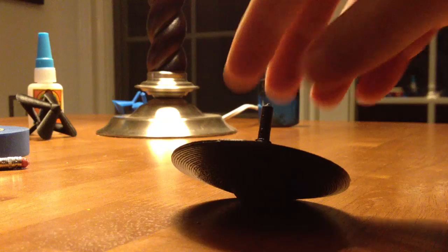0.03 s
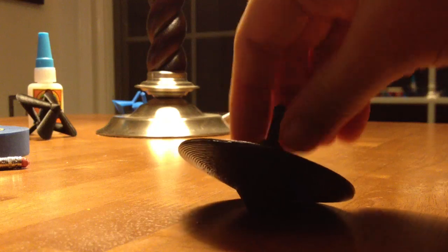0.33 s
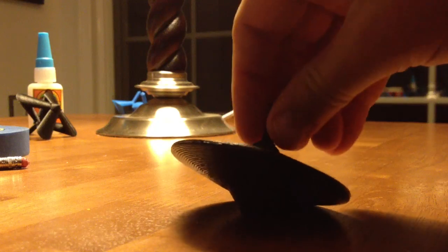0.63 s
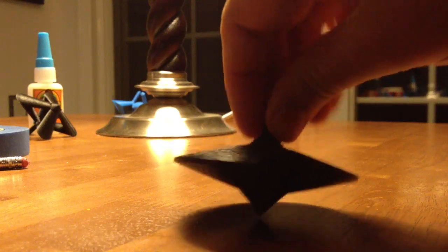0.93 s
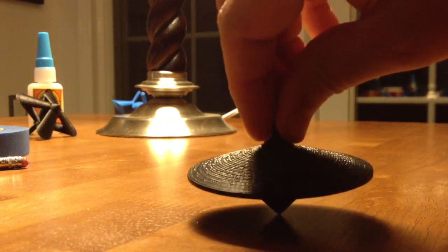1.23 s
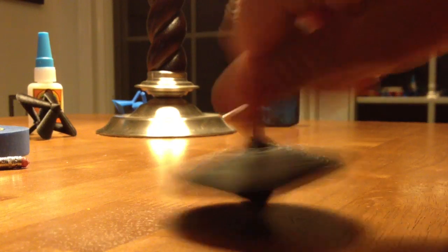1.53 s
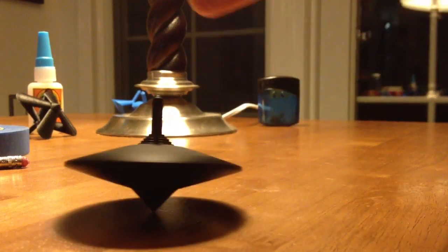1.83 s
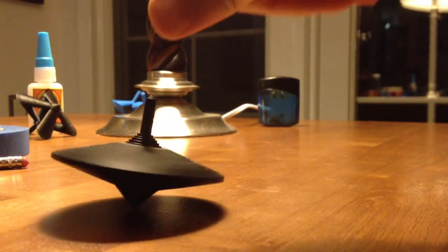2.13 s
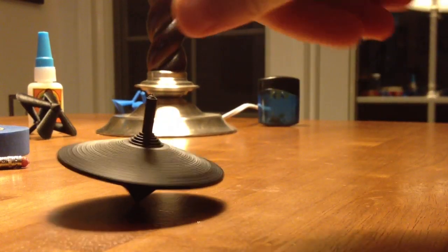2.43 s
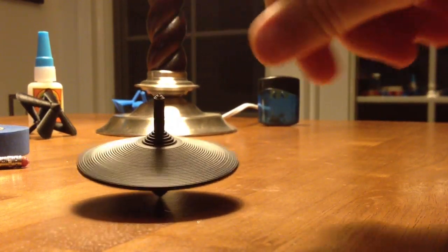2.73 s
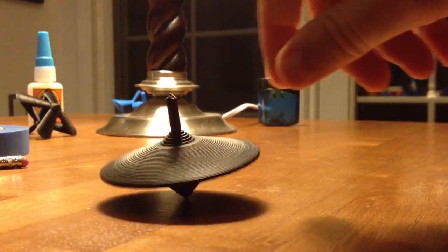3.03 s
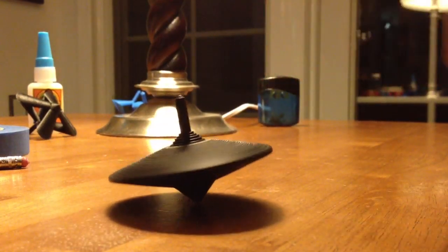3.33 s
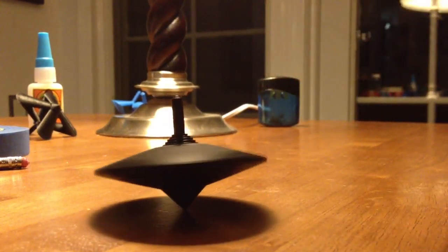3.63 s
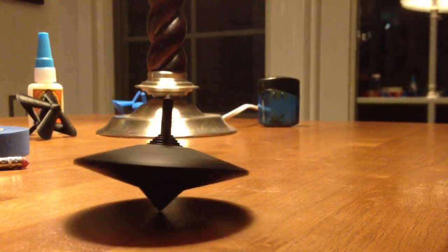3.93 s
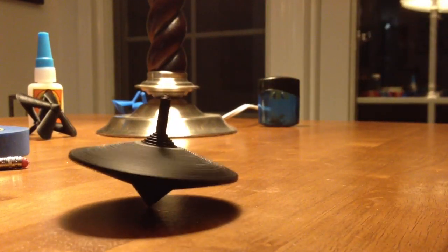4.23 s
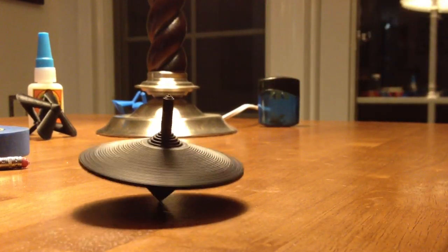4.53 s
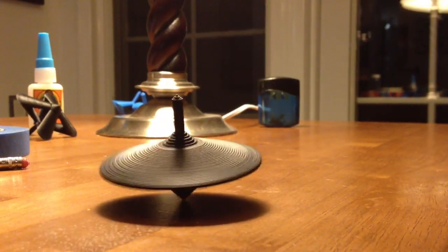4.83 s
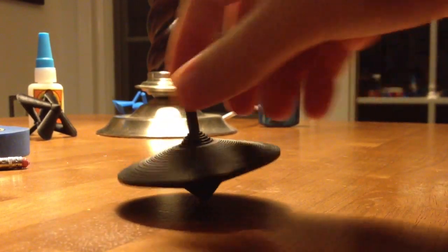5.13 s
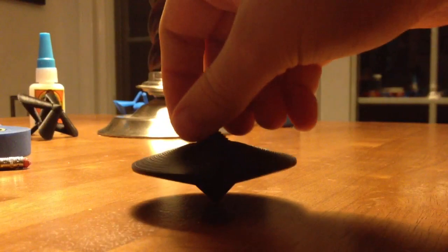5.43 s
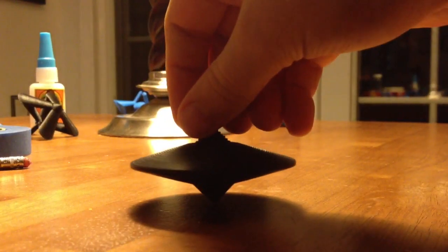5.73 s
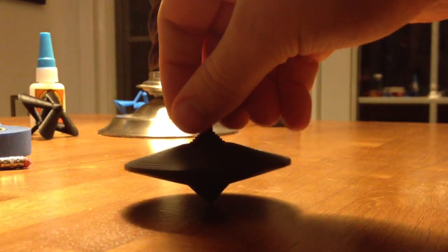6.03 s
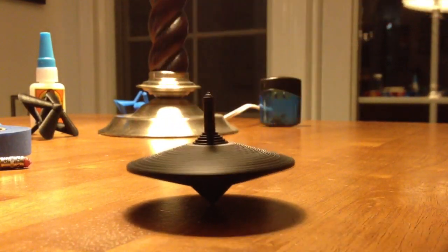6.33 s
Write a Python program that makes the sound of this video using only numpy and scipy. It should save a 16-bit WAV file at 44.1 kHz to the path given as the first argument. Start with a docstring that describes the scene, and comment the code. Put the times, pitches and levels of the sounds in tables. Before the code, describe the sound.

Sharp plastic clacks and a hollow tok on wood, then a top chatters off and rumbles softly as it spins in a quiet room.

```python
"""A quiet room, a small microphone close to a wooden table. Fingers pick up a plastic spinning top:
its rim clacks on the wood, the tip is set down with a hollow tok, and a twist of the stem sends it
chattering off. The rolling tip keeps the table ringing in a low, uneven rumble until the fingers
brush the stem again. Far under it lie two faint sleeve swishes and the steady room tone."""
import sys
import numpy as np
from scipy import signal
from scipy.fft import rfft, irfft
from scipy.io import wavfile

SR = 44100
rng = np.random.default_rng(int(sys.argv[2]) if len(sys.argv) > 2 else 0)


def wav_record(signal):
    """Record a signal, one row per channel, as 16-bit PCM in the file named by sys.argv[1]."""
    frames = np.transpose(np.atleast_2d(signal))
    bounded = np.clip(frames, -1, 1)
    # unit amplitude maps onto the largest positive 16-bit level
    quanta = np.round(bounded * 32767).astype(np.int16)
    wavfile.write(sys.argv[1], SR, quanta)


N = 282240
TIME = np.arange(N) / SR


def free_spin(wood, release_s=1.8, catch_s=5.44, turn_hz=14.0, wobble=0.22):
    """The tip rolls over the grain, pressing harder once a turn; ridges jolt it and swell the rumble."""
    # ridges under the tip: (time [s], relative force [dB])
    bumps = [(1.847, -28.5), (2.236, -27), (2.418, -25), (2.472, -26), (2.522, -22.5), (2.565, -36),
             (2.62, -29), (3.048, -31), (3.17, -25), (3.348, -24.5), (3.461, -25), (3.521, -27.5),
             (3.582, -30.5), (3.885, -29), (4.178, -27), (4.356, -26), (4.576, -27), (4.725, -25.5),
             (4.97, -31), (5.022, -25), (5.145, -29.5), (5.361, -24.5)]
    # the top's bounce changes pitch as the tip wanders over the table: (time [s], pitch [Hz])
    bounce_pitch = [(1.8, 263), (2.1, 254), (2.9, 289), (3.2, 301), (3.6, 299), (3.9, 267), (4.2, 285),
                    (4.9, 280), (5.4, 299)]
    bounce_hz = np.interp(TIME, *np.transpose(bounce_pitch))
    load = 1 + wobble * np.sin(2 * np.pi * turn_hz * TIME)
    rolling = bounce(grains(per_s=700, spread_db=1.5) * load, bounce_hz, t60=0.051)
    spinning = undb(-47) * swell(release_s, rise_s=0.043, hold_s=catch_s - release_s, fall_s=0.05)
    ridges = sum(undb(db - 15) * swell(s, rise_s=0.022, hold_s=0, fall_s=0.099) for s, db in bumps)
    rumble = unit(through(rolling, wood)) * np.hypot(spinning, ridges)
    jolts = blows(*np.transpose(bumps), corner_hz=516)
    return rumble - undb(-7.5) * bounce(jolts, bounce_hz, t60=0.08) + undb(-11) * through(jolts, wood)


def twist(wood, first_hop_hz=2480, last_hop_hz=460, scratch_db_per_decade=14):
    """The pressed tip hops and skids; the harder a hop lands, the more it scratches."""
    # landings of the tip: (time [s], relative force [dB])
    landings = [(1.559, -30.5), (1.5695, -37), (1.5875, -25), (1.615, -25.5), (1.625, -28), (1.648, -25),
                (1.6559, -26), (1.6743, -28.5), (1.684, -26), (1.695, -24.5), (1.7076, -19.5),
                (1.7160, -26), (1.7253, -31), (1.7386, -23), (1.753, -24.5), (1.7590, -20.5),
                (1.7759, -26.5)]
    # spectrum of the scratches: (frequency [Hz], relative level [dB])
    grit_colour = [(800, 4.5), (1900, 9), (2550, 2), (3300, 3.5), (5000, -2.5), (8000, -10), (15000, -37)]
    s, db = np.transpose(landings)
    # the hops land ever softer as the fingers let go
    progress = (s - s[0]) / (s[-1] - s[0])
    corner_hz = first_hop_hz * (last_hop_hz / first_hop_hz) ** progress ** 1.56
    hops = blows(s, db, corner_hz)
    # each landing dents the wood with a short tick, and a soft low thump sounds with it
    knocks = through(hops, wood) + through(hops, ring(hz=[1050], t60=[0.007], db=[0]))
    thump = undb(-17) * through(hops, ring(hz=[122], t60=[0.15], db=[0]))
    pressure = undb(-35) * swell(1.608, rise_s=0.11, hold_s=0.097, fall_s=0.15)
    friction = soften(grains(per_s=1100, spread_db=1.5), corner_hz=1700)
    skid = unit(through(friction, wood)) * pressure
    scratch_db = db + scratch_db_per_decade * np.log10(corner_hz / first_hop_hz)
    scratches = bursts(blows(s, scratch_db, corner_hz), t60=0.043)
    return knocks + thump + skid + colour(scratches, grit_colour) * undb(-72.5)


def rim_clacks(wood):
    """Hard plastic on wood: the table thuds, the disc pings and its edge cracks briefly."""
    # the rim drops and bounces: (time [s], relative thud [dB], relative disc ring [dB])
    clacks = [(0.5612, -26, -26), (.5778, -30, -30), (0.5883, -28.5, -33), (0.595, -59, -39),
              (0.6, -38, -43), (.6910, -26.5, -31), (.6950, -34, -38)]
    # modes of the plastic disc: (frequency [Hz], t60 [s], relative level [dB])
    disc_modes = [(4225, 0.02, -1.5), (4370, 0.014, -3), (4670, 0.022, -12.5), (5850, .007, -1.5),
                  (6320, 0.01, -7), (6800, 0.012, -12), (7630, 0.013, -7), (8150, 0.0075, -13),
                  (8960, 0.015, -7), (9430, 0.016, -8), (11200, 0.0062, -1.5), (12100, 0.0067, -13),
                  (12800, .006, -4), (14400, 0.0058, -6)]
    s, thud_db, disc_db = np.transpose(clacks)
    thud = through(blows(s, thud_db, corner_hz=4180), wood)
    edge = blows(s, disc_db, corner_hz=30000)
    ping = through(edge, ring(*np.transpose(disc_modes)))
    crack = bursts(edge, t60=0.046)
    return undb(-1) * thud + undb(2) * ping + undb(-19) * crack


def set_down(wood):
    """The tip lands with a hollow tok: the wood rings and the top rocks on its point."""
    # the tip touches and settles: (time [s], relative force [dB], contact corner [Hz])
    touches = [(1.1988, -16, 1220), (1.211, -21, 400)]
    push = blows(*np.transpose(touches))
    return undb(-8.5) * (through(push, wood) - bounce(push, hz=335, t60=0.12))


def table_top():
    """Responses under rim and tip: the wood flexes at once, then waves from its edges build the modes."""
    # modes of the board: (frequency [Hz], t60 [s], relative level under rim [dB], under tip [dB])
    board_modes = [(174, 0.114, -28, -15), (256, 0.128, -12, -6), (286, 0.156, -18, -6),
                   (323, 0.126, -6, -1), (348, 0.059, -16, 0), (411, 0.095, -12, -4), (463, 0.072, -1, -3),
                   (516, 0.06, -6, -4), (622, 0.051, 0, -3), (666, 0.047, -2, -5), (715, 0.057, -6, -7),
                   (926, 0.077, -12, -12), (1027, 0.069, -4, -11), (1100, 0.035, -8, -11),
                   (1177, 0.094, -18, -14), (1287, 0.036, -17, -12), (1543, 0.058, -17, -10),
                   (1720, 0.048, -17, -17), (1952, 0.032, -23, -14), (2581, 0.026, -13, -10),
                   (2934, 0.014, -16, -10), (3417, 0.014, -22, -9)]
    hz, t60, rim_db, tip_db = np.transpose(board_modes)
    under_rim = ring(hz, t60, rim_db) + undb(2) * ring(hz=[600], t60=[0.008], db=[0])
    under_tip = ring(hz, t60, tip_db) - undb(-3) * ring(hz=[430], t60=[0.014], db=[0])
    return under_rim, under_tip


def fingers(squeak_s=5.47):
    """Skin ridges catch on the turning stem in a fine hiss, with a thin squeak as the braking starts."""
    # skin twisting the stem and flicking off it: (frequency [Hz], relative level [dB])
    rub_colour = [(2000, -25), (4000, -2), (6000, -2.5), (8000, -1), (9800, -4), (11300, 3), (13200, -3),
                  (14400, 6), (15500, -5)]
    # fingertips lightly braking the stem: (frequency [Hz], relative level [dB])
    brush_colour = [(4000, -30), (7500, -16), (10000, -20), (11200, -6), (12400, -4), (13400, -4),
                    (14500, 3), (15500, -1)]
    slide = undb(-53) * swell(1.561, rise_s=0.073, hold_s=0, fall_s=0.11)
    flick = undb(-45) * swell(1.544, rise_s=0.014, hold_s=0, fall_s=0.0098)
    braking = undb(-63) * swell(5.59, rise_s=0.22, hold_s=0.23, fall_s=0.49)
    rub = colour(grains(per_s=14000, spread_db=0), rub_colour) * (slide + flick)
    brush = colour(grains(per_s=16000, spread_db=2), brush_colour) * braking
    touch = np.exp(-((TIME - squeak_s) / 0.014) ** 2)
    squeak = through(grains(per_s=9000, spread_db=1.5), ring(hz=[14350], t60=[0.006], db=[0]))
    return rub + brush + undb(-64) * unit(squeak) * touch


def sleeve():
    """Cloth fibres slide over each other in a soft, high swish."""
    # the arm draws back and returns: (time [s], half-width [s], level [dB])
    swishes = [(3.69, 0.09, -71), (4.68, .04, -70)]
    # spectrum of the cloth: (frequency [Hz], relative level [dB])
    cloth_colour = [(2500, -12), (5000, -2), (7500, 2.5), (10000, -4), (12000, 2), (15000, -5)]
    motion = sum(undb(db) * np.exp(-((TIME - s) / width) ** 2) for s, width, db in swishes)
    return colour(grains(per_s=12000, spread_db=3), cloth_colour) * motion


def room_tone():
    """Steady low air noise with a few room resonances, and a faint hiss above it."""
    # spectra of the low air and of the hiss: (frequency [Hz], relative level [dB])
    low_colour = [(50, -47), (75, -52), (105, -12), (150, -7), (210, 0.5), (300, 1), (360, 0), (410, -8.5),
                  (600, -11), (850, -10), (1200, -11.5), (1500, -14), (1850, -25), (2600, -43.5)]
    hiss_colour = [(1200, -5.5), (1800, -2.5), (2350, -1.5), (3200, -2.5), (3600, -7.5), (4400, -4),
                   (5300, -10.5), (7500, -14), (10000, -27.5), (12000, -19), (15000, -16)]
    # room resonances: (frequency [Hz], t60 [s], relative level [dB])
    room_modes = [(154.5, 0.37, -5), (232, 0.11, -2), (332.8, 0.33, 0.5), (493.6, 0.31, -5),
                  (611.6, 0.1, -2.5), (708.5, 0.31, -8)]
    low = colour(rng.standard_normal(N), low_colour) * undb(-50)
    drone = unit(through(rng.standard_normal(N), ring(*np.transpose(room_modes)))) * undb(-54.5)
    hiss = colour(rng.standard_normal(N), hiss_colour) * undb(-65.5)
    return low + drone + hiss


def bounce(force, hz, t60):
    """The top's weight rocks on its springy point; the pitch may drift."""
    turn = np.exp(2j * np.pi * np.cumsum(hz * np.ones(N)) / SR)
    decay = np.exp(-np.log(1000) / t60 / SR)
    return np.imag(turn * signal.lfilter([1], [1, -decay], force / turn))


def blows(times, db, corner_hz):
    """One short push for each blow; a lower corner is a longer push."""
    out, t = np.zeros(N), TIME[:SR // 100]
    for s, level, hz in np.broadcast(times, db, corner_hz):
        push = t * np.exp(-2 * np.pi * hz * t)
        start = int(s * SR)
        out[start:start + len(t)] += undb(level) * push / push.sum()
    return out


def ring(hz, t60, db):
    """Impulse response of decaying modes, neighbours swinging in opposite senses; peak 1."""
    t = TIME[:SR // 2]
    out = sum((-1) ** k * undb(level - 60 * t / life) * np.sin(2 * np.pi * f * t)
              for k, (f, life, level) in enumerate(zip(hz, t60, db)))
    return out / np.abs(out).max()


def grains(per_s, spread_db):
    """Random tiny catches of uneven size; rms 1."""
    hit = rng.random(N) < per_s / SR
    sign = rng.choice([-1, 1], N)
    size = undb(spread_db * np.minimum(rng.exponential(size=N), 3))
    return unit(hit * sign * size)


def bursts(push, t60):
    """Each push frees a short puff of fresh noise."""
    decay = np.exp(-np.log(1000) * TIME[:SR // 4] / t60)
    return through(np.abs(push), decay) * rng.standard_normal(N)


def swell(at_s, rise_s, hold_s, fall_s):
    """Gain that reaches 1 at a time, holds and dies; rise and fall are the times for 20 dB."""
    before = np.maximum(at_s - TIME, 0)
    after = np.maximum(TIME - at_s - hold_s, 0)
    return undb(-20 * (before / rise_s + after / fall_s))


def soften(x, corner_hz):
    """Drop the treble, as a soft contact does."""
    return signal.sosfilt(signal.butter(2, corner_hz, fs=SR, output="sos"), x)


def colour(x, points):
    """Shape a sound with a spectrum of (frequency [Hz], level [dB]) points; rms 1."""
    hz, db = np.transpose(points)
    f = np.maximum(np.fft.rfftfreq(N, 1 / SR), 1)
    gain = undb(np.interp(np.log(f), np.log(hz), db))
    return unit(irfft(rfft(x) * gain, N))


def through(x, response):
    """Convolve with an impulse response."""
    return signal.fftconvolve(x, response)[:N]


def undb(db):
    """Decibels to gain."""
    return 10 ** (np.asarray(db) / 20)


def unit(x):
    """Scale to rms 1."""
    return x / np.sqrt(np.mean(x ** 2))


def room_tail(t60, corner_hz):
    """The room's diffuse, dying echo; unit energy."""
    t = TIME[:SR // 2]
    out = soften(rng.standard_normal(len(t)), corner_hz) * np.exp(-np.log(1000) * t / t60)
    return out / np.sqrt(np.sum(out ** 2))


def scene():
    """The top and the hand close up, with a little echo and the room tone behind them; mono."""
    under_rim, under_tip = table_top()
    contacts = rim_clacks(under_rim) + set_down(under_tip) + twist(under_tip) + free_spin(under_tip)
    # a board open on both sides radiates little bass
    radiated = signal.sosfilt(signal.butter(3, 170, "high", fs=SR, output="sos"), contacts)
    near = radiated + fingers() + sleeve()
    echo = through(near, room_tail(t60=0.18, corner_hz=8000)) * undb(-20)
    return (near + echo + room_tone())[None]


def record(dry, open_s=0.083, low_cut_hz=95, high_cut_hz=15300):
    """The small microphone opens after a moment, thins the bass and cuts the highest treble."""
    opened = dry * np.clip((TIME - open_s) / 0.0023, undb(-59), 1)
    thin = signal.sosfilt(signal.butter(2, low_cut_hz, "high", fs=SR, output="sos"), opened)
    return signal.sosfilt(signal.ellip(10, 0.2, 70, high_cut_hz, fs=SR, output="sos"), thin)


dry = scene()
out = record(dry)
wav_record(out)
```